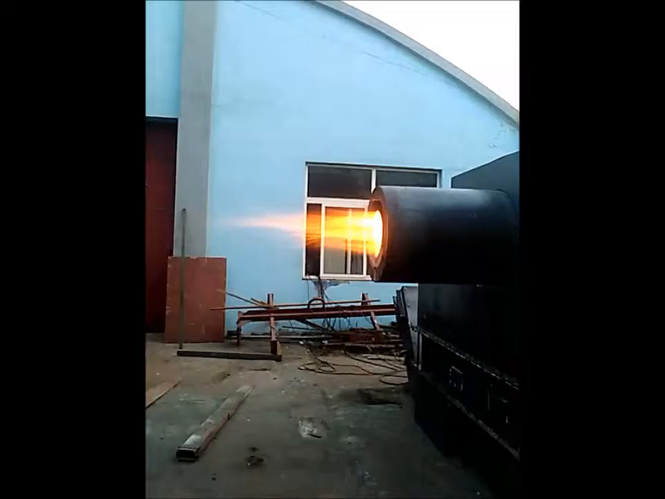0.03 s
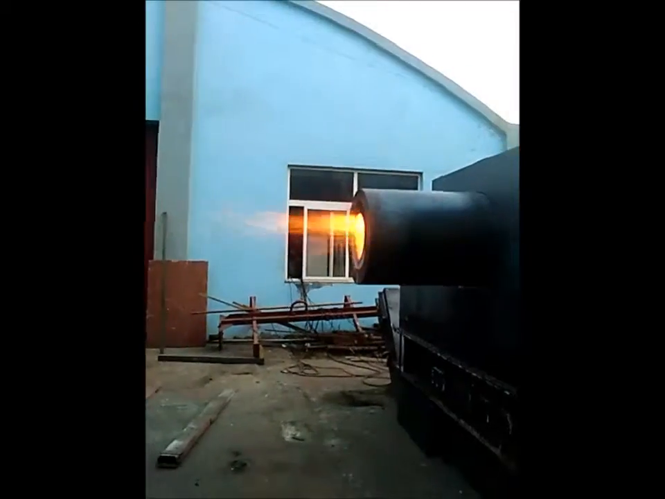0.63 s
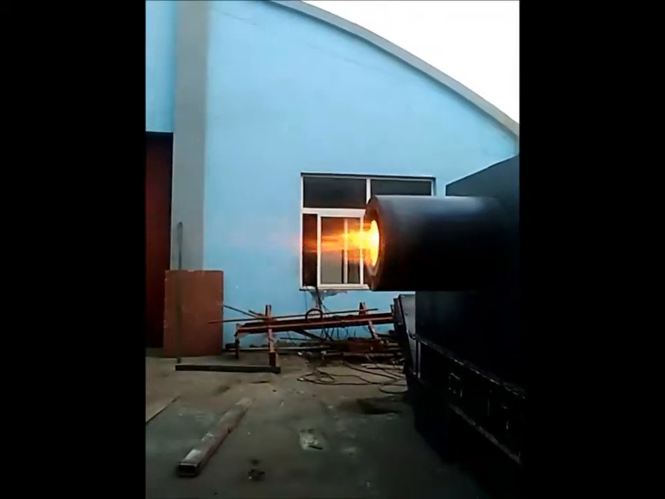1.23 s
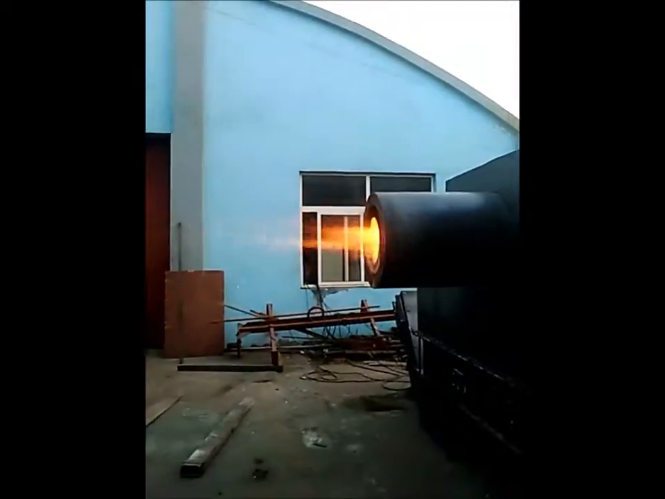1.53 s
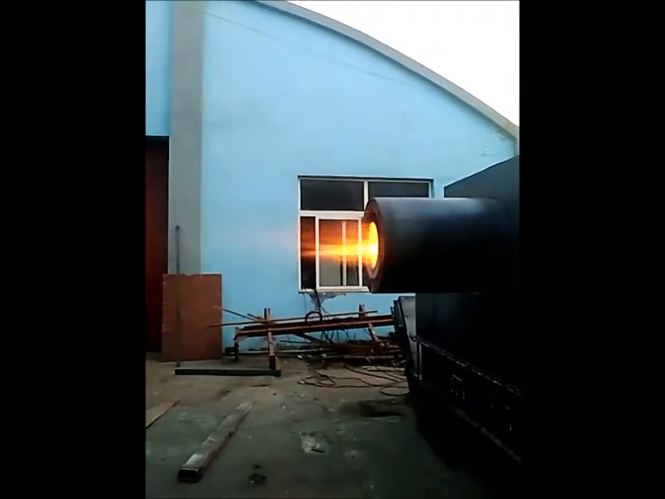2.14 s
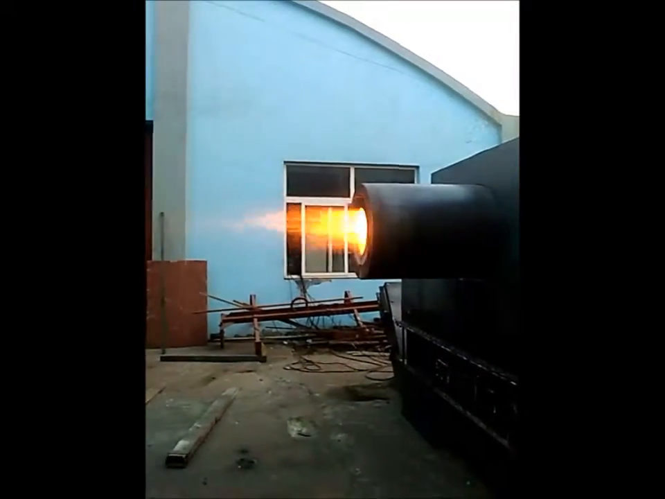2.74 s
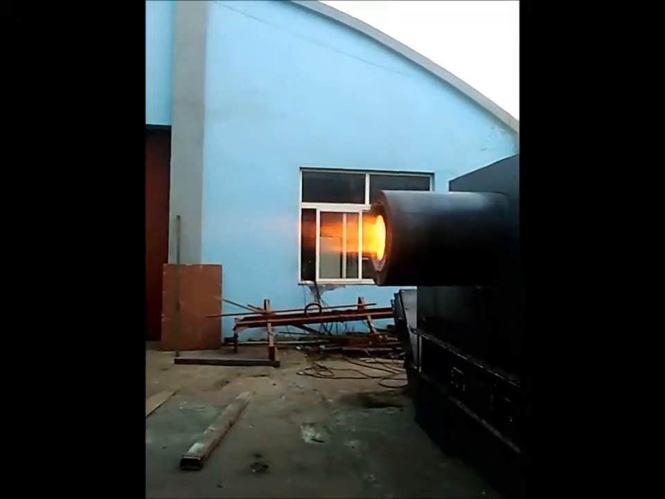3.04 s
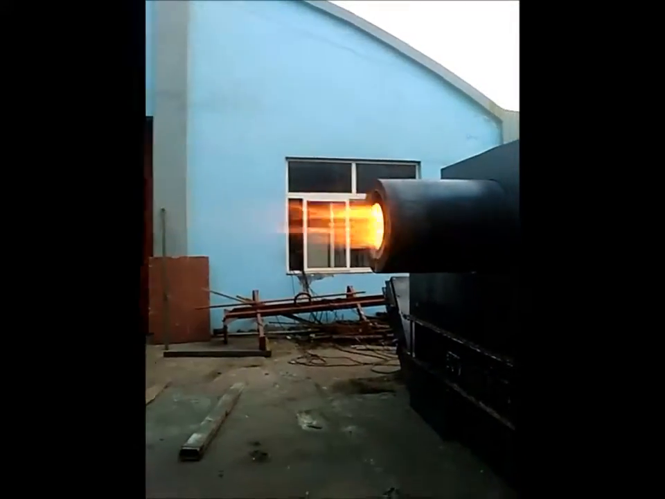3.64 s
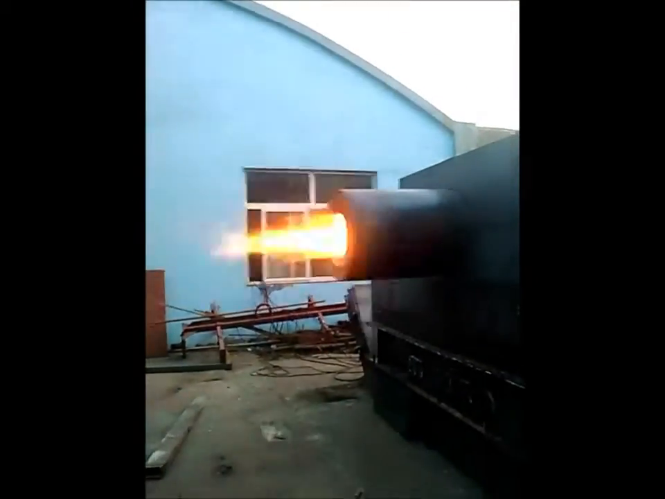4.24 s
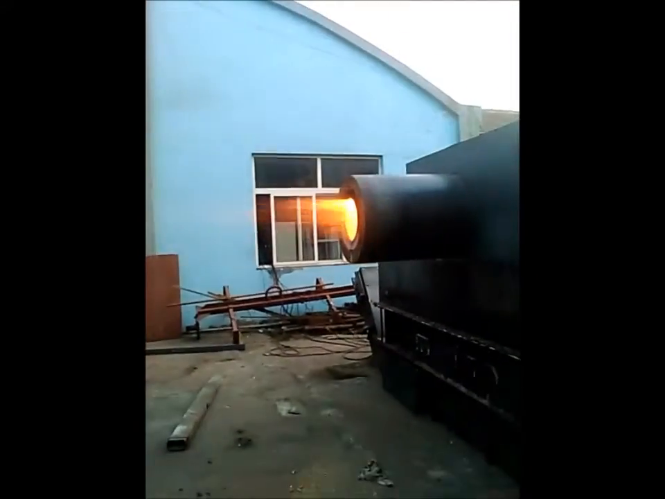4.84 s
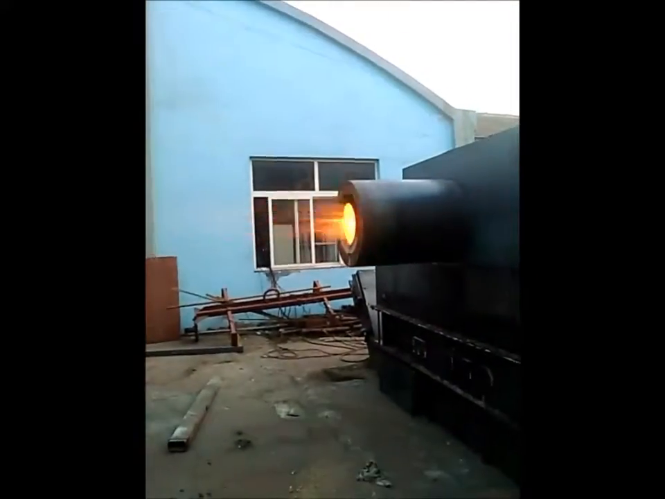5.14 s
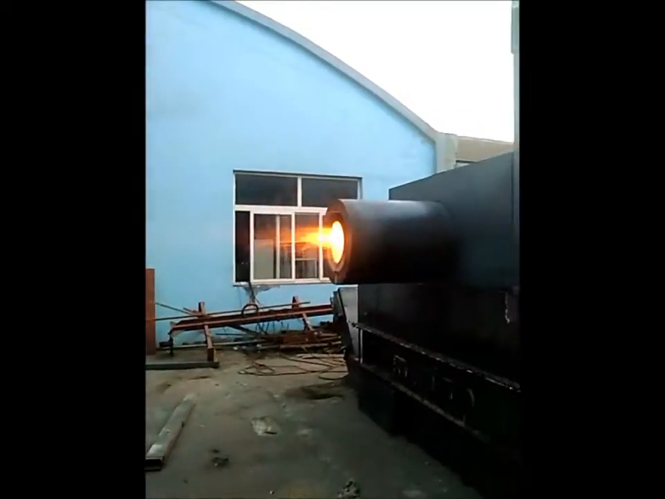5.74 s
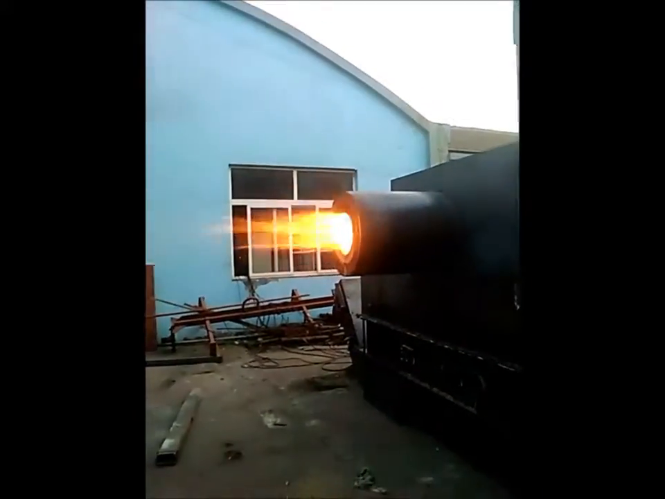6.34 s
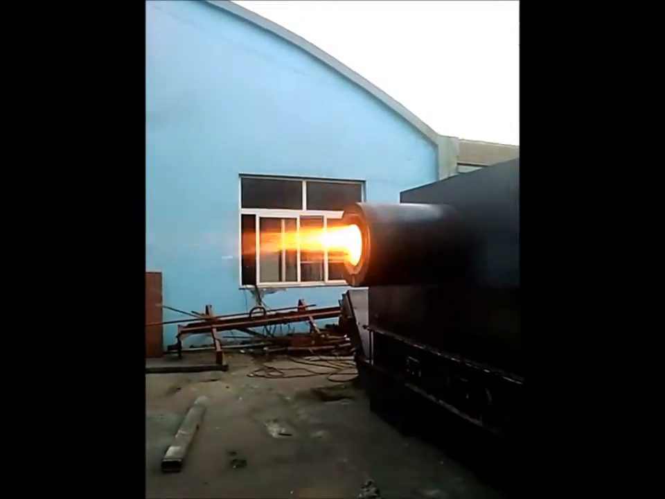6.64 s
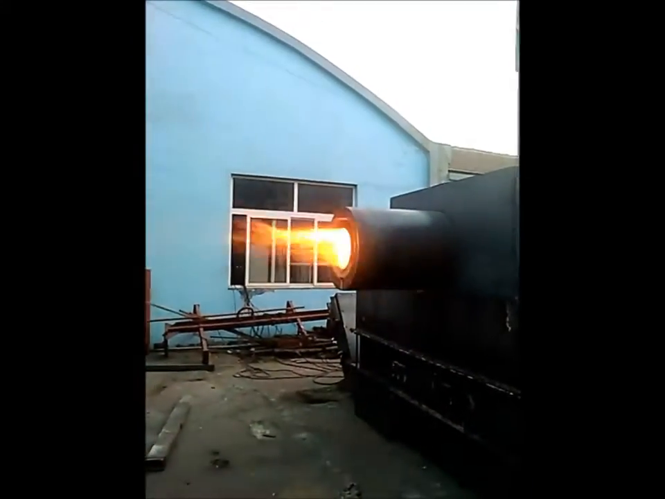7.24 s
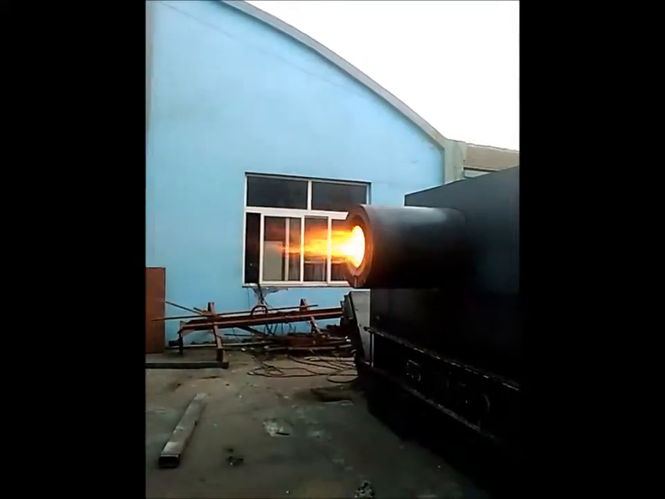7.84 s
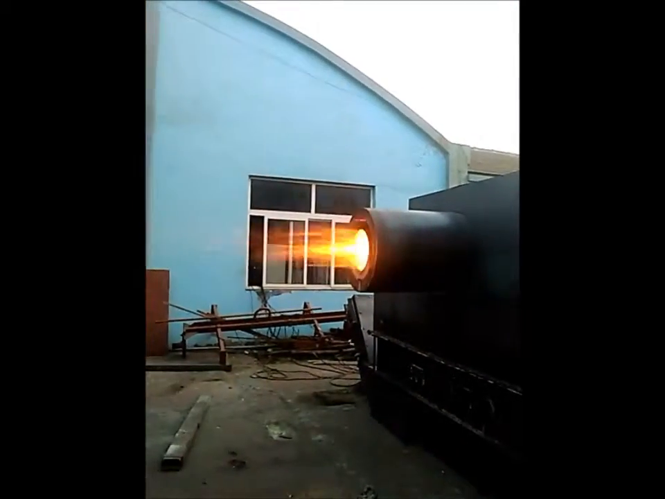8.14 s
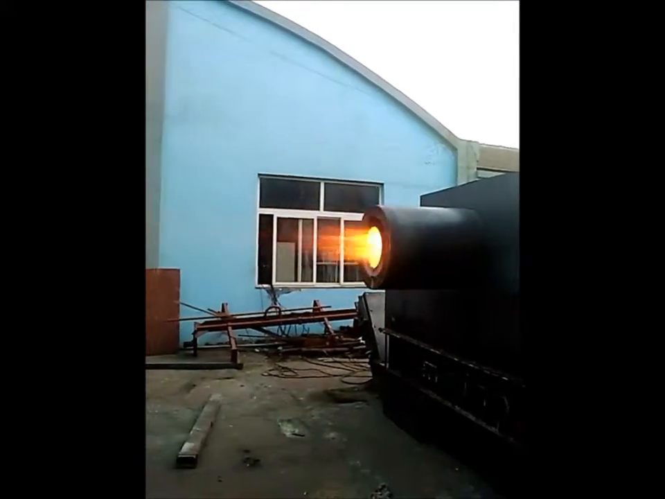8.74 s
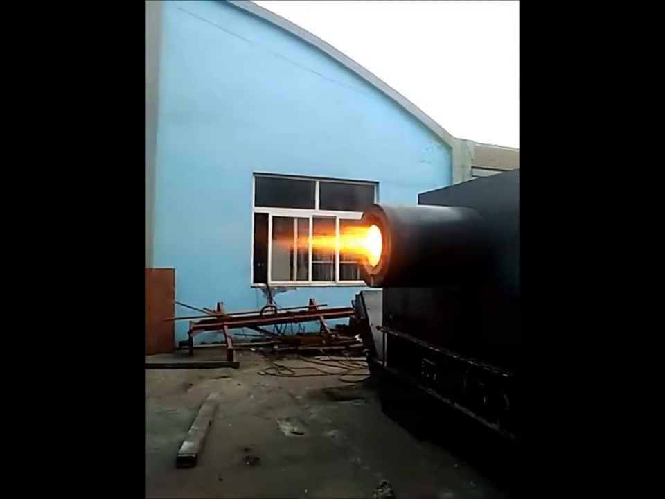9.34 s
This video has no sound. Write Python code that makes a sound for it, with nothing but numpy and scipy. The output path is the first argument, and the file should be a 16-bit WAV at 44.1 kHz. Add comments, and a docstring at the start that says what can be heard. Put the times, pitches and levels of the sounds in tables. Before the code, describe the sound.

After silence, the sound opens abruptly at about 0.6 seconds on a burner already running in a yard, heard from a close, hand-held microphone. The flame makes a low, hollow roar in its tube, with a softer rushing hiss above. It continues to the end, fluttering with small irregular puffs, the stronger ones near 1, 2, 4.4, 6.4 and 8 seconds. A blower holds a steady, medium-pitched hum throughout, which weakens between about 4.3 and 5.3 seconds and then returns. A faint, thin, high motor whine is clearest in the first two seconds, wavers in and out until about 5.5 seconds, nearly vanishes, and comes back around 9 seconds. As the microphone drifts, the rush changes colour slightly. The overall level stays fairly even, and the burner is still running at the end, a little past 9 seconds.

```python
"""Pellet burner in a yard

Turbulent combustion roars in a resonant fire tube, under the broadband rush of the flame's jet. A blower hums
at its blade-passing frequency and its motor whines faintly. The sound begins abruptly; a close, hand-held
microphone drifts: the tones swell and fade, and echoes comb the flame's noise differently."""
import sys
import numpy as np
from scipy import signal
from scipy.fft import rfft, irfft
from scipy.io import wavfile
from scipy.ndimage import uniform_filter1d

SR = 44100
rng = np.random.default_rng(int(sys.argv[2]) if len(sys.argv) > 2 else 0)


def wav_out(sig):
    """Save sig, one row per channel (or a flat mono array), as 16-bit PCM at SR to the path in sys.argv[1]."""
    wavfile.write(sys.argv[1], SR, np.round(np.clip(np.atleast_2d(sig).T, -1, 1) * 32767).astype(np.int16))


N = 413658
T = np.arange(N) / SR
FREQS = np.fft.rfftfreq(N, 1 / SR)


def amp(db):
    """Amplitude ratio of a level in decibels."""
    return 10 ** (np.asarray(db) / 20)


def unit(x):
    """Normalisation to rms 1."""
    return x / np.sqrt(np.mean(x ** 2) + 1e-20)


def follow(rows):
    """Linear interpolation in time of each column after the first."""
    times, *columns = np.transpose(rows)
    return [np.interp(T, times, column) for column in columns]


def swell(centre_s, half_s, db):
    """A Gaussian rise and fall of level, in dB."""
    return db * np.exp(-((T - centre_s) / half_s) ** 2)


def waver(rate_hz):
    """Random fluctuation of rms 1: noise low-passed at the given rate."""
    t = np.arange(0, N / SR, 1 / 500)
    f = np.fft.rfftfreq(len(t), t[1])
    slow = irfft(rfft(rng.standard_normal(len(t))) / (1 + (f / rate_hz) ** 2), len(t))
    return np.interp(T, t, unit(slow))


def tone(hz, db):
    """A sinusoid at an rms level; its phase is the integral of its frequency."""
    cycles = np.cumsum(hz * np.ones(N)) / SR + rng.random()
    return np.sqrt(2) * amp(db) * np.sin(2 * np.pi * cycles)


def filtered(x, edges_hz, kind, order=3):
    """Zero-phase filtering: one pass forward, one backward."""
    return signal.sosfiltfilt(signal.butter(order, edges_hz, kind, fs=SR, output="sos"), x)


def evened(x, span_s, share=0.85):
    """Envelope compression: short-term power is drawn toward its two-second mean."""
    short, slow = (uniform_filter1d(x ** 2, int(s * SR)) + 1e-20 for s in (span_s, 2))
    return x * (slow / short) ** (share / 2)


# Each row: time in seconds, microphone place on a scale from 0 to 2.
MICROPHONE_PATH = [(2.05, 0.04), (2.65, 1), (3.8, 0.9), (5, 2.02)]

def place():
    """The microphone's position as it drifts through the sound field."""
    return np.clip(follow(MICROPHONE_PATH)[0], 0, 2)


def drifted(first, last):
    """Linear interpolation between a value at place 0 and one at place 2."""
    return first + (last - first) * place() / 2


def coloured(noise, table, band_hz):
    """Spectrum depends on position: a crossfade of three shapings, each of rms 1 in the band."""
    hz, *spectra = np.transpose(table)
    bandpass = signal.butter(6, band_hz, "bandpass", fs=SR, output="sos")
    heard = np.zeros(N)
    for k, db in enumerate(spectra):
        gain = amp(np.interp(np.log(FREQS + 1), np.log(hz), db))
        shaped = irfft(rfft(noise) * gain, N)
        nearness = np.maximum(1 - abs(place() - k), 0)
        heard += nearness * shaped / np.std(signal.sosfilt(bandpass, shaped))
    return heard


# Each row: centre and half length in seconds, low and high edge in Hz, level in dB.
TREBLE_HISSES = [(.72, .18, 9500, 12500, -77.5), (3.798, .42, 9000, 10700, -88),
                 (3.85, .05, 8000, 10500, -80)]

def treble_hiss():
    """Band-limited noise: a faint treble hiss is heard as the sound opens; a fainter hiss is heard later."""
    hiss = np.zeros(N)
    for s, half_s, low, high, db in TREBLE_HISSES:
        noise = unit(filtered(rng.standard_normal(N), (low, high), "bandpass"))
        hiss += noise * amp(db) * np.exp(-((T - s) / half_s) ** 4)
    return hiss


# The whine along the microphone's path. Each row: time in seconds, level in dB.
WHINE_LEVELS = [(.62, -53.5), (.75, -55), (.98, -59), (1.15, -58), (1.6, -58.5), (1.97, -67), (2.09, -65),
                (2.21, -69.5), (2.38, -60), (2.5, -62), (2.61, -59.5), (2.78, -64.5), (3.1, -68.5),
                (3.57, -84), (3.7, -63.5), (4.22, -63.5), (4.33, -81.5), (4.45, -61), (4.6, -75.5),
                (4.72, -68.5), (4.85, -78.5), (4.97, -62.5), (5.08, -70.5), (5.18, -62.5), (5.4, -71.5),
                (6.4, -73.5), (7.3, -80.5), (8.7, -76), (8.92, -64.5), (9.3, -61.5)]
# The motor's side tones. Each row: frequency in Hz, level in dB.
MOTOR_TONES = [(2063, -60), (2578, -66), (3094, -67), (4125, -70), (5867, -77), (5955, -72), (5999, -78),
               (6043, -76), (6088, -78), (6175, -79), (6219, -79), (7074, -85)]

def motor(whine_hz=6131.5):
    """An uneven sound field: a thin whine and its side tones vary with the microphone's place."""
    wander_hz = 1.1 * waver(rate_hz=3)
    whine_db = follow(WHINE_LEVELS)[0]
    side_db = 0.15 * (whine_db - whine_db.mean())
    whine = tone(whine_hz + wander_hz, whine_db + 0.7 * waver(rate_hz=5))
    sides = sum(tone(hz + wander_hz, db + side_db + 2 * waver(rate_hz=2.2)) for hz, db in MOTOR_TONES)
    return whine + sides


# Each row: blower tone in Hz, centre and half length in seconds, lift in dB.
TONE_SPOTS = [(559.5, 2.7, .7, 4), (570.8, 4.3, .3, 5), (570.8, 8.4, 1, -4), (814.3, 4.7, .8, -5),
              (861.8, 4.15, .25, 7), (861.8, 5.45, .4, 4.5), (861.8, 7.55, .55, -7), (908.8, 3.7, .9, 4.5),
              (1205.6, 3.7, .4, -8), (1205.6, 5.7, 1, -3), (1031.2, 4, .6, -5), (1546.8, 4.25, .4, -8),
              (1546.8, 8.4, .35, 3)]

def spots(tone_hz):
    """Interference gives a blower tone its own loud and dead spots; returns the lift in dB."""
    return sum(swell(s, half_s, db) for hz, s, half_s, db in TONE_SPOTS if abs(hz - tone_hz) < 1)


# Each row: frequency in Hz, level in dB at place 0 and at place 2.
MACHINE_TONES = [(46.9, -61, -61), (559.5, -41, -51), (570.8, -52, -42), (814.3, -55, -40),
                 (861.8, -52, -44.5), (908.8, -43.5, -47.5), (1075, -56, -55), (1205.6, -46.5, -49.5)]

def machine_hum():
    """A line spectrum: the blower's low shaft hum and weak, wavering tones, some evenly spaced."""
    hum = np.zeros(N)
    for hz, first, last in MACHINE_TONES:
        wander_hz = 0.32 * waver(rate_hz=1.53)
        hum += tone(hz + wander_hz, drifted(first, last) + spots(hz) + waver(rate_hz=3.4))
    return hum


# The fundamental through its loud and dead spots. Each row: time in seconds, level in dB.
BLADE_LEVELS = [(0.62, -32), (1.05, -28.5), (2.55, -28), (2.76, -32.5), (2.97, -25.5), (3.4, -26),
                (4.1, -29), (4.45, -36), (4.57, -32.5), (4.84, -39), (5.1, -32.5), (5.8, -29.5),
                (6.1, -28.8), (6.8, -26.5), (7.8, -27), (8.3, -26), (9.37, -25)]
# Harmonics 2 and 3. Each row: level in dB at place 0 and at place 2, share of the fundamental's swell.
BLADE_OVERTONES = [(-44.5, -50.5, 0.21), (-44, -49.5, .35)]

def blades(passing_hz=515.6):
    """The blower's blades chop the air periodically, giving harmonics of the blade-passing rate."""
    hz = passing_hz * (1 + 0.0004 * waver(rate_hz=2))
    blade_db = follow(BLADE_LEVELS)[0]
    swell_db = blade_db - blade_db.mean()
    overtones_db = [drifted(first, last) + share * swell_db for first, last, share in BLADE_OVERTONES]
    return sum(tone(k * hz, db + spots(k * passing_hz) + 0.77 * waver(rate_hz=4.7))
               for k, db in enumerate([blade_db, *overtones_db], 1))


# Each row: delay in milliseconds at place 0 and at place 2, then amplitude ratio at each.
REFLECTIONS = [(4.28, 4.01, .07, .31), (5.8, 5.8, .19, .1)]

def echoed(x):
    """Comb filtering: dulled reflections from two near surfaces interfere with the direct sound."""
    dull = filtered(x, 3500, "lowpass", order=1)
    paths = [(drifted(*row[:2]), drifted(*row[2:])) for row in REFLECTIONS]
    return x + sum(strength * np.interp(T - delay_ms / 1000, T, dull) for delay_ms, strength in paths)


# A bright band and a narrower ring in the rush. Each row: time in seconds, centre in Hz, lift in dB.
BRIGHT_BAND = [(.62, 3180, 5.5), (1.3, 3140, -3.5), (2.1, 3100, -1), (2.5, 3400, 1), (3.5, 3150, 0),
               (4.1, 2830, 3.5), (4.5, 2650, 1.5), (5.4, 2760, 3), (6.4, 2780, 1.5), (7.3, 2830, 1.5),
               (9.3, 2860, 3)]
RING_BAND = [(2.95, 1450, -1.5), (3.35, 1440, 4), (3.8, 1440, 1.5), (4.6, 1390, 3), (5.4, 1510, 2),
             (6, 1550, .5), (9.3, 1555, 2.5)]

def sliding_bands(x):
    """Heterodyne filtering lifts or lowers two bands that slide as the microphone moves."""
    for rows, width_hz in ((BRIGHT_BAND, 240), (RING_BAND, 91)):
        hz, lift_db = follow(rows)
        carrier = np.exp(2j * np.pi * np.cumsum(hz) / SR)
        pole = np.exp(-np.pi * width_hz / SR)
        baseband = signal.filtfilt([1 - pole], [1, -pole], x / carrier)
        band = 2 * (carrier * baseband).real
        x = x + band * (amp(lift_db) - 1)
    return x


# Each row: frequency in Hz, relative spectral density in dB at places 0, 1 and 2.
RUSH_SPECTRUM = [(25, -33, -26.5, -33), (915, 18, 15.5, 12), (1210, 11.5, 10.5, 11.5), (1460, 16, 14.5, 13),
                 (1950, 11, 6.5, 7), (2300, 7.5, 5.5, 5), (2810, -4.5, 3, 3), (3440, -2, 3, 0.6),
                 (4310, -0.5, -0.5, 1), (5680, -10, -9.5, -9), (6620, -19, -18, -17),
                 (7870, -24, -25.5, -26.5), (9840, -42, -40.5, -40.5), (12000, -40.5, -43, -41.5),
                 (14000, -48, -50, -52)]

def rush(flare_db):
    """Jet turbulence radiates broadband noise, which here grows slowly louder."""
    noise = coloured(rng.standard_normal(N), RUSH_SPECTRUM, band_hz=(3300, 5600))
    return noise * amp(-47 + 0.0823 * T + flare_db)


# Each row: centre and width in Hz, lift in dB.
TUBE_RESONANCES = [(90, 23, 4.5), (143, 21, 2.5), (212, 23, 1.5), (242, 18, 1), (291.6, 27, 4),
                   (389, 11, -1), (444.6, 75, 5.5), (536, 36, -6), (628, 28, 3.5), (773, 34, 2.5),
                   (1170, 30, -1)]

def tube(noise):
    """Standing waves in the fire tube reinforce some bands and hollow out others."""
    lift_db = sum(db / (1 + (2 * (FREQS - hz) / width) ** 2) for hz, width, db in TUBE_RESONANCES)
    return irfft(rfft(noise) * amp(lift_db), N)


# Each row: centre and half length in seconds, lift in dB.
FLAME_SURGES = [(.85, 0.13, 3.3), (1.45, .08, 1.5), (1.77, .07, 1.7), (2.05, .17, -2), (2.3, .1, 0),
                (2.62, .1, 1.3), (3.02, 0.053, 4.5), (3.35, .06, 1.5), (3.71, 0.058, 4.5), (3.94, 0.065, 4),
                (4.33, 0.18, 3.5), (4.72, 0.063, 3), (5.03, .08, 0.5), (5.33, .07, 0.5),
                (5.566, 0.066, 2.7), (5.9, 0.06, -2.5), (6.22, 0.13, 2.5), (6.72, .14, 1.7),
                (7.05, 0.066, 2), (7.42, 0.09, 1), (7.73, .07, -2), (8.08, 0.057, 4), (8.26, .06, -0.5),
                (8.42, .08, 2), (9.323, 0.061, 2.2)]

def surging(x, rest_db=-1):
    """Amplitude modulation of one band: the tube mouth's hollow note surges and sinks with the flame."""
    hollow = filtered(x, (570, 950), "bandpass")
    lift_db = rest_db + sum(swell(s, half_s, db) for s, half_s, db in FLAME_SURGES)
    return x - hollow + evened(hollow, span_s=0.16) * amp(lift_db)


# Each row: frequency in Hz, relative spectral density in dB at places 0, 1 and 2.
ROAR_SPECTRUM = [(22, -46.5, -49.5, -48.5), (45, -26, -29, -31.5), (80, -23, -21.5, -21.5),
                 (111, -23.5, -23.5, -22), (177, -12.5, -13, -12.5), (210.6, -0.5, -4, -3.5),
                 (246, 0.5, -2.5, -2), (299, -7.5, -8.5, -5.5), (347, -11, -12, -9.5),
                 (490, -14, -16, -16.5), (580, -13, -12, -10.5), (795, -15, -15.5, -13),
                 (1130, -33.5, -27, -27.5), (14000, -130, -130, -130)]
# Puffs of fuel catch, or the fire starves. Each row: centre in seconds, lift in dB.
FUEL_PUFFS = [(.77, 2.5), (.95, 2), (1.02, 5), (1.12, -1), (1.19, 2.5), (1.235, -3.5), (1.29, 3),
              (1.35, -1), (1.4, 2.5), (1.48, 3), (1.61, -1), (1.71, 3.5), (1.98, 4.5), (2.05, -2),
              (2.13, -2.5), (2.24, -1), (2.44, -2.5), (2.72, 2.5), (3.01, 3.5), (3.25, -3.5), (3.51, 3.5),
              (3.68, 2), (3.95, 1.5), (4.16, 2.5), (4.35, -2.5), (4.41, 4.5), (4.68, 3.5), (4.92, 1.5),
              (4.99, -1.5), (5.09, -2), (5.26, 3), (5.63, 0), (5.72, -3.8), (5.86, 1.5), (6.04, -3),
              (6.25, 3.5), (6.34, 1.5), (6.41, 6.5), (6.63, -5.5), (6.93, 3.5), (7.05, 3), (7.12, 3),
              (7.21, -2.8), (7.28, 1.5), (7.37, 3.5), (7.54, -2), (7.67, 1.5), (7.96, 4.5), (8.08, 3.5),
              (8.22, 1.5), (8.29, 2.5), (8.45, 3), (8.59, 1.5), (8.82, 1.5), (8.91, 3.5), (9.02, 3.5),
              (9.2, 4)]

def roar(flare_db, puff_half_s=0.035):
    """Combustion noise excites the tube; puffs swell its low boom, flares the range above."""
    noise = coloured(tube(rng.standard_normal(N)), ROAR_SPECTRUM, band_hz=(120, 420))
    boom = filtered(noise, 400, "lowpass")
    upper = (noise - boom) * amp(0.92 * flare_db)
    puff_db = sum(swell(s, puff_half_s, db) for s, db in FUEL_PUFFS)
    boom = evened(boom, span_s=0.07) * amp(-0.5 - 0.0974 * T + puff_db)  # slowly weakens
    return (boom + upper) * amp(-25 - 0.0027 * T)


# Longer flares of the jet. Each row: centre in seconds, lift in dB.
JET_FLARES = [(.78, 1), (1.4, 0.8), (2.6, 0.6), (3.4, 0.8), (4.15, 0.4), (4.55, 1), (5.38, 0.5), (6.3, 1),
              (6.75, 1), (7.6, -0.2), (8.2, 1.5)]

def flame(flare_half_s=0.2):
    """Common modulation: one turbulent flame makes roar and rush flutter and flare together."""
    flutter = waver(rate_hz=6.8)
    flare_db = sum(swell(s, flare_half_s, db) for s, db in JET_FLARES)
    return roar(flare_db) * amp(0.34 * flutter) + rush(flare_db) * amp(0.63 * flutter)


def scene():
    """Superposition of flame, blower and motor at one microphone, with a faint treble hiss."""
    fire = sliding_bands(echoed(surging(flame())))
    return (fire + blades() + machine_hum() + motor() + treble_hiss())[None]


def record(dry):
    """Gating and band limiting: the sound starts within a millisecond and the highest treble is cut."""
    open_s, edge_hz = 0.617, 14300
    gate = np.clip((T - open_s) / 0.001, 0, 1)
    lowpass = signal.firwin(511, edge_hz, window=("kaiser", 9), fs=SR)
    return signal.oaconvolve(dry * gate, lowpass[None], "same")


dry = scene()
out = record(dry)
wav_out(out)
```